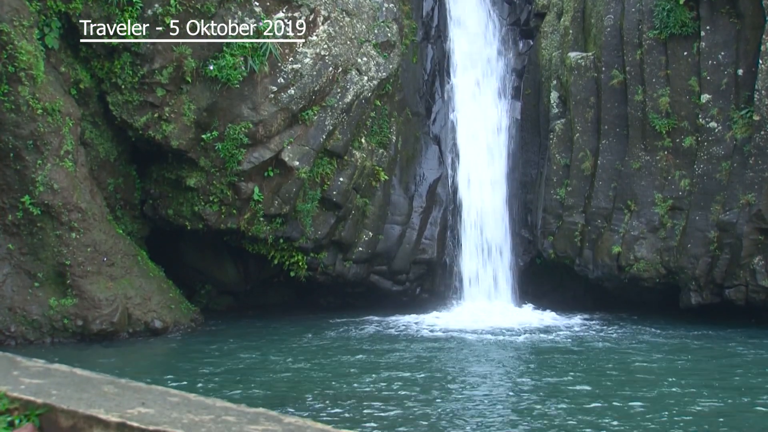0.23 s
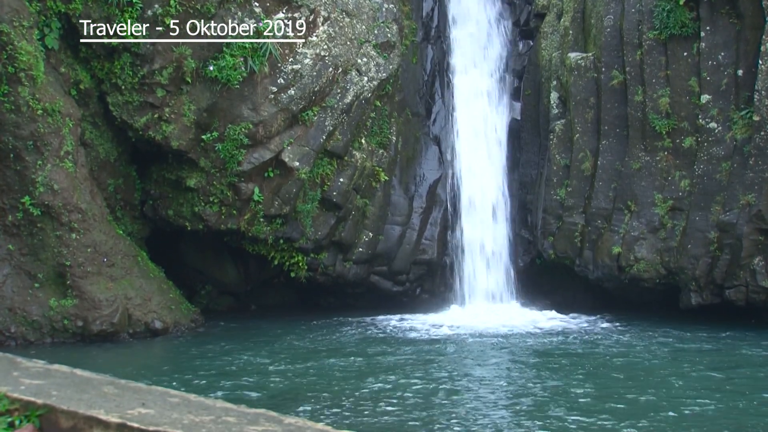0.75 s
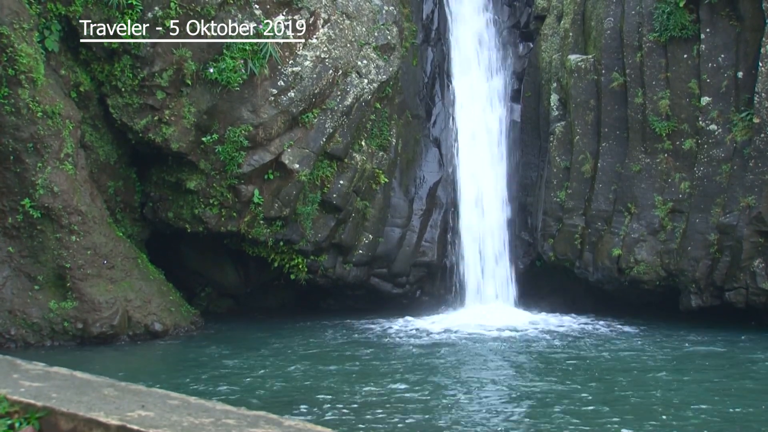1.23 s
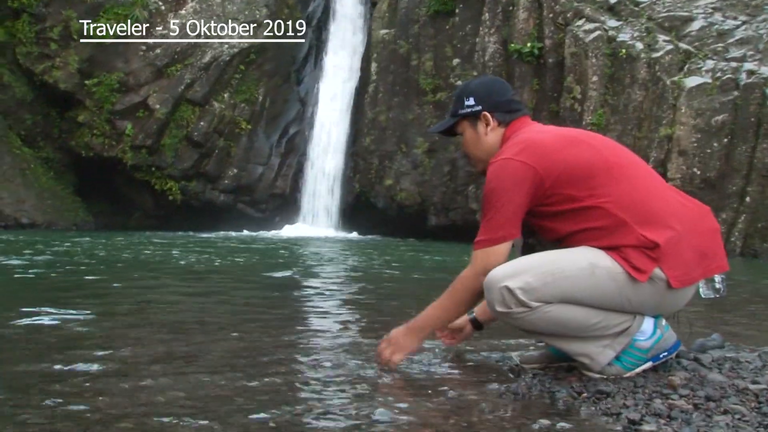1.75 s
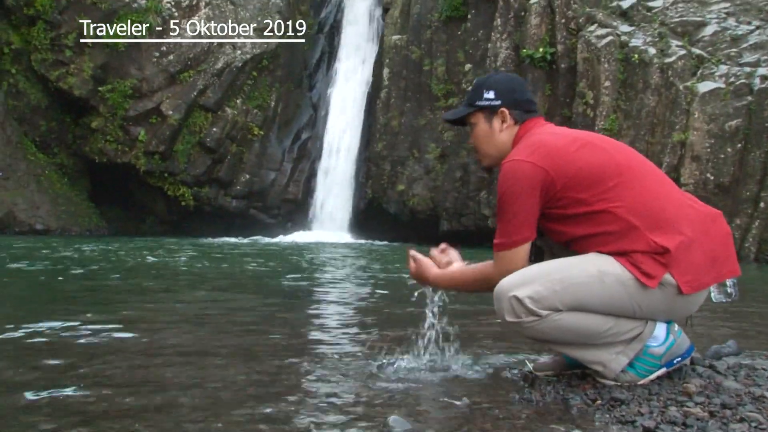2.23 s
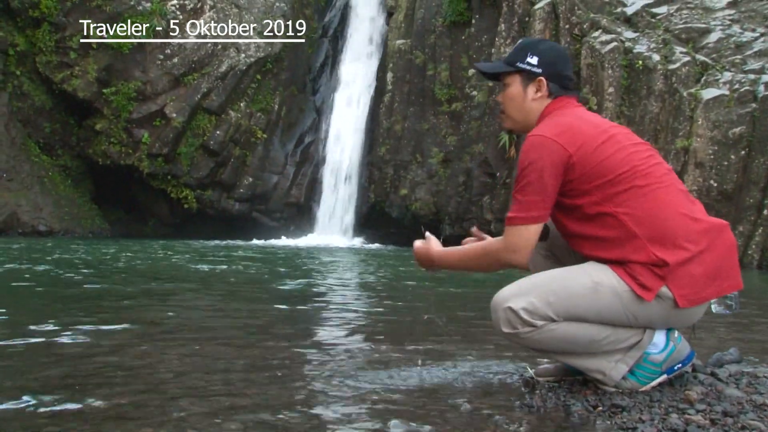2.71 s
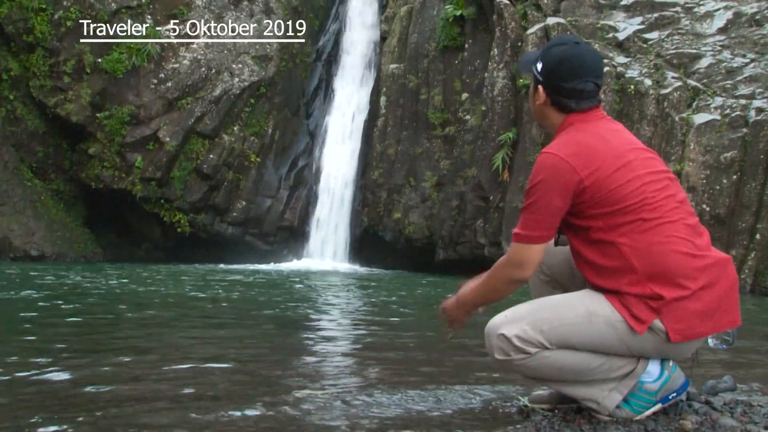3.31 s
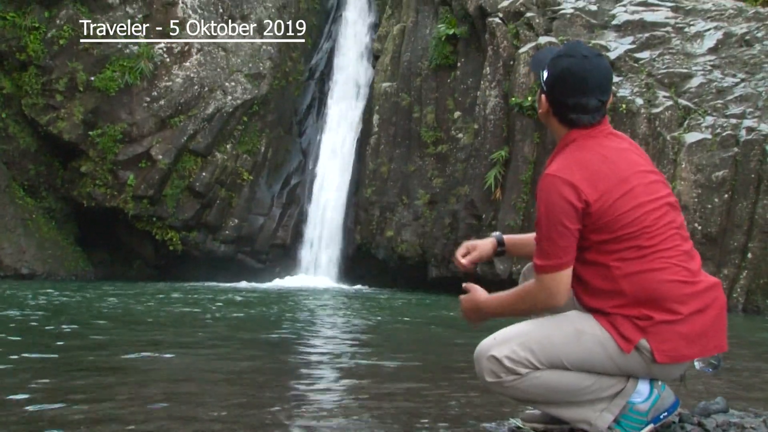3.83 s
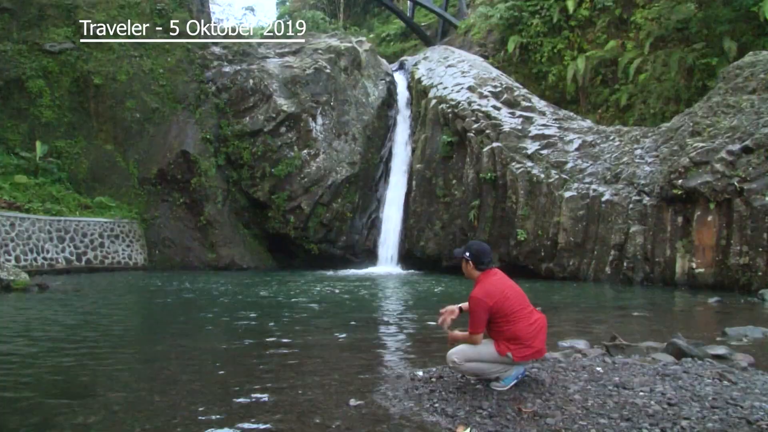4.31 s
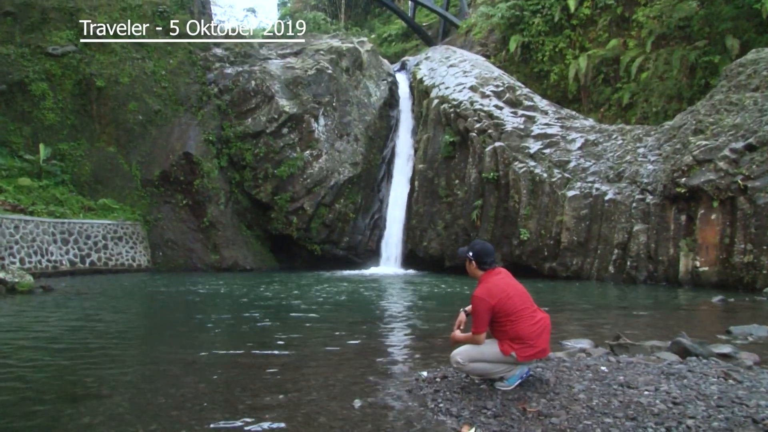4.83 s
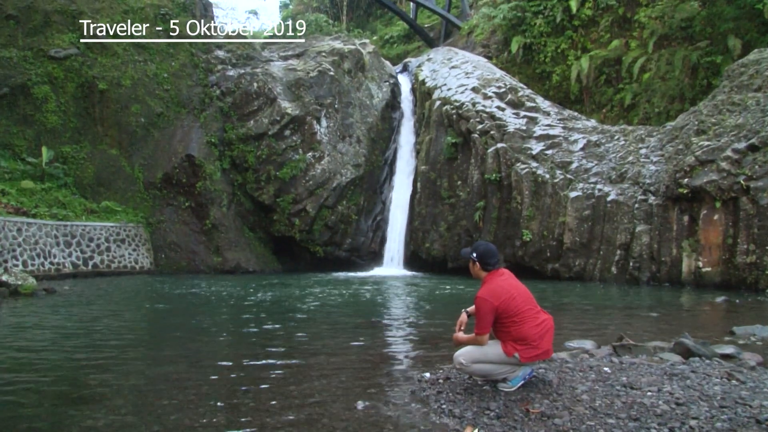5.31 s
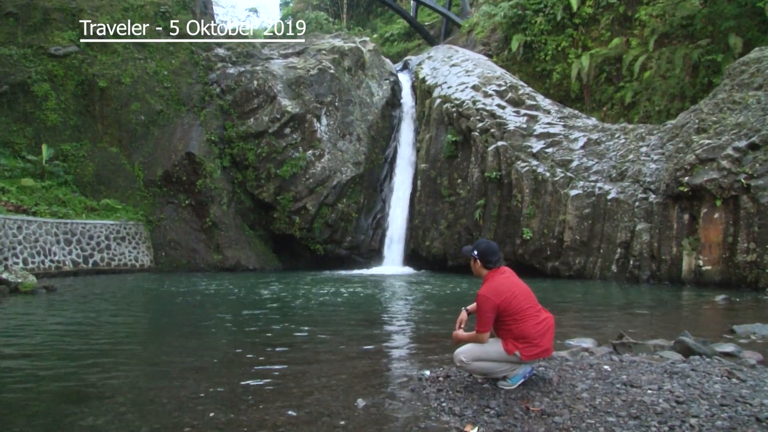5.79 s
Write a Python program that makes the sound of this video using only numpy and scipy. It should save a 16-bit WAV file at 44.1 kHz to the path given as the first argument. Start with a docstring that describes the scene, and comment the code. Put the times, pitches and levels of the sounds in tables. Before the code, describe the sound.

Steady falling-water roar in three views: facing it, at the shore with close hand splashes and one sharp knock, then distant and duller.

```python
"""A tall waterfall plunges into a pool in a rock hollow, heard in mono from three places in turn.
First, facing it, coloured noise and random impacts rush over rumble swells; a fade is cut to silence.
Next, at the shore, the rush is combed by a ground echo while hands scoop water close by: ringing bubbles
churn, trickle and spray, single drops snap and plink, and one knock rings; all of it fades.
Last, the fall goes on more quietly from farther off, with less hiss and the hum of the hollow."""
import sys
import numpy as np
from scipy import signal
from scipy.fft import rfft, irfft, next_fast_len
from scipy.io import wavfile

SR = 44100
rng = np.random.default_rng(int(sys.argv[2]) if len(sys.argv) > 2 else 0)


def put_to_file(sound):
    """Save the sound as 16-bit audio at rate SR, in the file named by the first command-line argument."""
    columns = np.atleast_2d(sound).T  # one column per channel
    safe = np.clip(columns, -1, 1)
    whole_steps = np.round(safe * 32767)
    wavfile.write(sys.argv[1], SR, whole_steps.astype(np.int16))


N = 267224
TIME = np.arange(N) / SR

# standing waves of the rock hollow, at the shore and farther off: (f/Hz, width/Hz, boost/dB)
HOLLOW = [(86.6, 8.6, 5), (110.4, 11.7, -8), (137.3, 17, 4), (199.5, 13.2, 7.5), (255, 11, 1.5),
          (304, 12, 2.5)]
# the shore stretch: (start t/s, fade begins t/s, fade would reach silence t/s, end t/s)
SHORE_SPAN = (1.463, 3.64, 4.385, 4.383)


def from_db(db):
    """Decibels to gain."""
    return 10 ** (np.asarray(db) / 20)


def rms_one(x):
    """Scale to unit power."""
    return x / np.sqrt(np.mean(x ** 2) + 1e-20)


def at_hz(points, hz):
    """Read a colour curve in dB on a log-frequency axis."""
    f, db = np.transpose(points)
    return np.interp(np.log(np.maximum(hz, 1)), np.log(f), db)


def bump(hz, centre_hz, width_hz):
    """Resonance curve of height 1."""
    return 1 / (1 + (2 * (hz - centre_hz) / width_hz) ** 2)


def low_pass(x, hz):
    """Very steep cut of the top."""
    sos = signal.ellip(12, .1, 80, hz, fs=SR, output="sos")
    return signal.sosfilt(sos, x)


def drift(rate_hz):
    """Slow random wander with spread 1: noise smoothed by two equal poles."""
    step = 40   # samples between the slow values
    r = np.exp(-2 * np.pi * rate_hz * step / SR)
    noise = rng.standard_normal(N // step + 2002)
    slow = signal.lfilter([1], [1, -2 * r, r * r], noise)[2000:]   # drop the filter's start-up
    return np.interp(np.arange(N) / step, np.arange(len(slow)), rms_one(slow))


def impacts(per_s, spread_db):
    """Random clicks of either sign, many small and a few large."""
    sizes = from_db(spread_db * np.minimum(rng.exponential(1, N), 4))
    signs = rng.choice([-1, 1], N)
    return sizes * signs * (rng.random(N) < per_s / SR)


def ring(clicks, hz, t60):
    """A unit click sets a tone of height 1 ringing, with little sound far from its pitch."""
    r = from_db(-60 / (t60 * SR))
    w = 2 * np.pi * hz / SR
    return signal.lfilter([.5, 0, -.5], [1, -2 * r * np.cos(w), r * r], clicks + 1e-18)


def swells(events, rise_s, fall_s):
    """Gain of events (t/s, level/dB) that build up and die away exponentially; their powers add."""
    power = 0
    for s, db in events:
        decay = np.maximum((s - TIME) / rise_s, (TIME - s) / fall_s)
        power = power + (from_db(db) * np.exp(-decay)) ** 2
    return np.sqrt(power)


def faded(span):
    """A stretch starts at once, fades along a straight line and is cut."""
    start, fade, silent, end = span
    inside = (TIME >= start) * (TIME < end)
    return inside * np.clip((silent - TIME) / (silent - fade), 0, 1)


def rush(colour, resonances, flutter_db):
    """Countless impacts over the roar of the bubble cloud, coloured by the rock; each octave flutters."""
    size = next_fast_len(N)
    hz = np.arange(size // 2 + 1) * SR / size
    roar = rng.standard_normal(N)
    water = rms_one(impacts(12000, spread_db=2.5)) + roar
    shape_db = at_hz(colour, hz)
    for f, width, db in resonances:
        shape_db = shape_db + db * bump(hz, f, width)
    spectrum = rfft(water, size) * from_db(shape_db)
    octave = np.clip(np.log2(np.maximum(hz, 1) / 50), 0, 8)   # octaves above 50 Hz
    out = 0
    for k in range(9):
        overlap = np.maximum(1 - abs(octave - k), 0)   # neighbouring bands crossfade
        band = irfft(spectrum * overlap, size)[:N]
        band_flutter_db = flutter_db * drift(22) / np.sqrt(1 + k)   # the fine spray is steadiest
        out = out + band * from_db(band_flutter_db)
    return rms_one(out)


def fall_distant():
    """Farther back the hiss is weaker and the hollow hums through."""
    # colour of the distant rush: (f/Hz, relative level/dB)
    distant_colour = [(22, -26), (50, -10), (90, -4), (160, -2), (360, -2), (520, -4.5), (780, -7.5),
                      (1300, -11.5), (2000, -18.5), (4500, -23), (7500, -19.5), (11300, -20.5),
                      (13000, -28), (15200, -42)]
    level_db, start_s = -43, 4.383
    resonances = HOLLOW + [(1480, 240, 2.3), (10300, 2500, 1.5)]   # (f/Hz, width/Hz, boost/dB)
    water = rush(distant_colour, resonances, flutter_db=1.5)
    return from_db(level_db) * water * (TIME >= start_s)


def over_ground(x):
    """The sound and its dull echo off the ground comb each other; the comb slides down as the detour grows."""
    # detour of the ground echo, growing as the microphone rises: (t/s, length/m)
    detour = [(1.5, .193), (2.1, .2), (2.7, 0.21), (3.25, .225), (3.5, 0.28), (4.2, 0.29)]
    echo_db, dull_hz, sound_m_per_s = -15.5, 4000, 343
    s, metres = np.transpose(detour)
    delay_s = np.interp(TIME, s, metres) / sound_m_per_s
    size = next_fast_len(N)
    hz = np.arange(size // 2 + 1) * SR / size
    dull = irfft(rfft(x, size) / np.hypot(1, hz / dull_hz), size)[:N]
    return x + from_db(echo_db) * np.interp(TIME - delay_s, TIME, dull)


def fall_from_shore():
    """From the pebble shore, where the ground echo slowly shifts the colour of the rush."""
    # colour of the rush at the shore: (f/Hz, relative level/dB)
    shore_colour = [(22, -15), (38, -15), (85, -3), (250, -0.5), (450, -2), (720, -5), (1150, -10.5),
                    (2200, -15), (3600, -17), (5000, -16.5), (11500, -16), (13000, -21.5), (15200, -36)]
    # resonances heard only at the shore: (f/Hz, width/Hz, boost/dB)
    shore_rock = [(716, 270, 3), (1430, 540, 2), (2500, 400, -1.5), (3470, 700, -.5), (6430, 1900, 1.1),
                  (10700, 2600, 2.5)]
    start_db, approach_db_per_s = -31.5, 0.29   # grows a little as the microphone moves
    water = over_ground(rush(shore_colour, HOLLOW + shore_rock, flutter_db=1.4))
    level_db = start_db + approach_db_per_s * (TIME - SHORE_SPAN[0])
    return from_db(level_db) * rms_one(water)


def fall_facing():
    """Facing the plunge: an open top, and a rumble that swells as lumps of water hit the pool."""
    # colour of the rush facing the fall: (f/Hz, relative level/dB)
    facing_colour = [(25, -27.5), (42, -5.5), (60, -3), (110, -2), (260, -1.5), (600, -6), (1000, -11),
                     (2000, -14), (4600, -14.5), (8000, -17), (11500, -19.5), (13500, -23), (16000, -24)]
    # heavy lumps of water hit the pool: (t/s, level/dB)
    lumps = [(.05, -33.5), (.87, -34.5)]
    # the facing stretch: (start t/s, fade begins t/s, fade would reach silence t/s, end t/s)
    facing_span = (0, 0.78, 1.47, 1.224)
    # resonances of the rock: (f/Hz, width/Hz, boost/dB)
    rock = [(113, 19, 1.5), (206.4, 26, 6.5), (285, 36, -6), (331, 22, 5), (554, 57, 0.5),
            (2210, 320, -0.5), (6020, 650, -1.5)]
    rush_db = -31.5
    rumble_band = signal.butter(2, [60, 135], "band", fs=SR, output="sos")
    rumble = rms_one(signal.sosfilt(rumble_band, rng.standard_normal(N)))
    thuds = swells(lumps, rise_s=0.041, fall_s=0.15) * rumble
    water = from_db(rush_db) * rush(facing_colour, rock, flutter_db=0.3)
    return (water + thuds) * faded(facing_span)


def bubbles(per_s, pitches, colour, cycles):
    """Random bubbles dealt over many pitches, each ringing for some cycles; even power at any rate."""
    clicks = impacts(per_s, spread_db=2.0) / np.sqrt(per_s)
    dealt = rng.integers(0, len(pitches), N)
    out = 0
    for k, hz in enumerate(pitches):
        tone = ring(clicks * (dealt == k), hz, t60=cycles / hz)
        out = out + from_db(at_hz(colour, hz)) * tone
    return rms_one(out)


def splash_spray():
    """Handfuls of water patter back as fine spray, each droplet ringing a tiny bubble."""
    # handfuls of water land on the pool: (t/s, level/dB, build-up/s)
    splashes = [(2.32, -37, .085), (2.368, -37, .012), (2.562, -31.5, 0.082), (2.572, -27, 0.0091)]
    # colour of the droplets: (f/Hz, relative level/dB)
    droplet_colour = [(1500, -12), (2500, -11.5), (4000, -1.5), (6000, -8.5), (9000, 7), (12000, 8)]
    fall_share = .7   # a splash dies faster than it builds up
    fewest_per_s, added_per_s, added_at_db = 270, 3500, -36.5   # a louder splash has more droplets
    power = 0
    for s, db, rise_s in splashes:
        power = power + swells([(s, db)], rise_s, fall_share * rise_s) ** 2
    spill = np.sqrt(power)
    per_s = fewest_per_s + added_per_s * spill / from_db(added_at_db)
    return spill * bubbles(per_s, np.geomspace(2200, 12000, num=26), droplet_colour, cycles=35)


def finger_trickle():
    """The lifted scoop trickles through the fingers as clear little bubbles."""
    # the lifted scoop: (t/s, level/dB)
    scoop = (2.3, -43.5)
    # colour of the trickle: (f/Hz, relative level/dB)
    trickle_colour = [(1700, -2.5), (3400, 0), (4600, 2)]
    trickle = bubbles(280, np.geomspace(1700, 4600, num=18), trickle_colour, cycles=57)
    return swells([scoop], rise_s=0.51, fall_s=0.29) * trickle


def hand_churn():
    """Hands ploughing through the pool churn large, low bubbles."""
    # the hands plough through the pool: (t/s, level/dB)
    dips = [(2.05, -40), (2.33, -43.5)]
    # colour of the churned bubbles: (f/Hz, relative level/dB)
    churn_colour = [(470, -2), (650, -12), (820, 4.5), (1000, -6), (1900, -16)]
    churn = bubbles(400, np.geomspace(470, 1900, num=16), churn_colour, cycles=32)
    return swells(dips, rise_s=0.13, fall_s=0.14) * churn


def drops(rise=0.079):
    """Each drop snaps on the surface; its bubble rings, the longer the lower, and rises in pitch as it dies."""
    # the largest single drops: (t/s, bubble level/dB, starting f/Hz, snap level/dB)
    big_drops = [(1.943, -24, 6360, -36), (2.126, -28.5, 783, -46), (2.168, -27.5, 797, -46),
                 (2.18, -28, 3720, -42), (2.2065, -17.5, 2630, -19), (2.267, -23.5, 1690, -36),
                 (2.277, -28, 2040, -38), (2.364, -27, 3700, -34), (2.3703, -18.5, 4200, -23.5),
                 (2.55, -22, 6700, -29), (2.563, -22.5, 3580, -29), (2.569, -10, 7870, -21)]
    bubble_cycles = 71   # a gently made bubble dies within so many cycles
    snap_damping, snap_s = 4.6, 0.0015   # a hard impact tears its bubble open sooner; decay of the snap
    out = np.zeros(N)
    t = np.arange(SR // 10) / SR
    onset = 1 - np.exp(-t / .0003)
    noises = rng.standard_normal((len(big_drops), len(t)))
    for (s, db, hz, snap_db), noise in zip(big_drops, noises):
        hardness = from_db(snap_db - db) ** 2
        t60 = bubble_cycles / hz / (1 + snap_damping * hardness)
        phase = 2 * np.pi * hz * t * (1 + rise * np.minimum(t / t60, 1) / 2)
        plink = from_db(db) * np.sin(phase) * np.exp(-np.log(1000) * t / t60)
        snap = from_db(snap_db) * noise * np.exp(-t / snap_s)
        at = round(s * SR)
        out[at:at + len(t)] += (plink + snap) * onset
    return out


def slap():
    """One sharp, very short knock among the drops; the soft contact rounds its start."""
    # the click that sets it ringing: (t/s, level/dB)
    knock = (2.4617, -14.5)
    # what rings: (f/Hz, level against the click/dB, t60/s)
    modes = [(3350, -8, 0.013), (5300, 2.5, 0.0057), (7150, -2, 0.0058)]
    s, db = knock
    click = np.zeros(N)
    click[round(s * SR)] = from_db(db)
    contact = np.clip((TIME - s) / .0003, 0, 1)
    return contact * sum(from_db(mode_db) * ring(click, hz, t60) for hz, mode_db, t60 in modes)


def scene():
    """The three places in turn, alike in both ears."""
    close_water = splash_spray() + finger_trickle() + hand_churn() + drops() + slap()
    soft_top = signal.butter(3, 13000, fs=SR, output="sos")
    splashes = signal.sosfilt(soft_top, close_water)
    shore = (fall_from_shore() + splashes) * faded(SHORE_SPAN)
    mono = fall_facing() + low_pass(shore + fall_distant(), hz=15250)
    return np.stack([mono, mono])


def record(dry):
    """The top is cut."""
    return low_pass(dry, hz=15900)


dry = scene()
out = record(dry)
put_to_file(out)
```